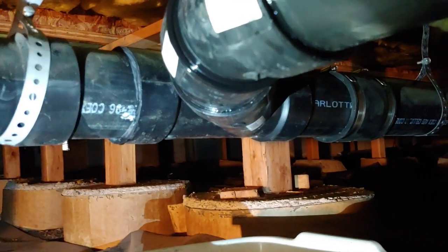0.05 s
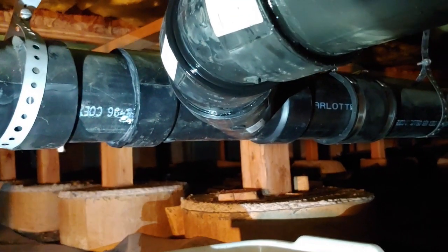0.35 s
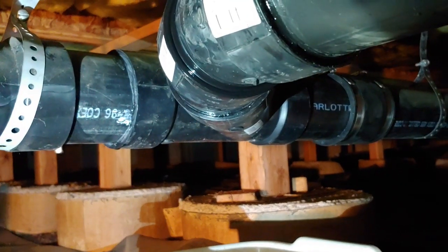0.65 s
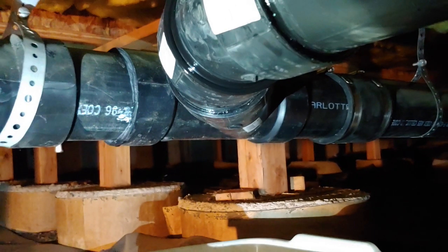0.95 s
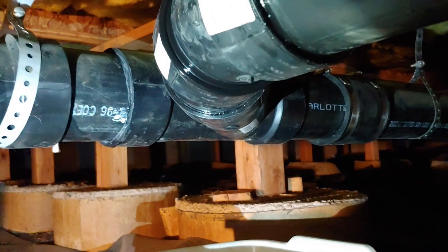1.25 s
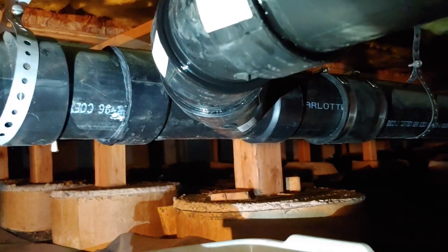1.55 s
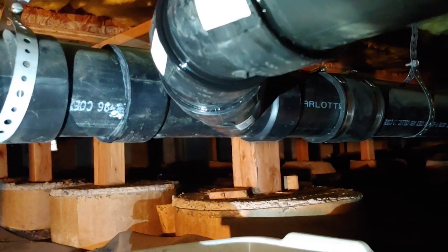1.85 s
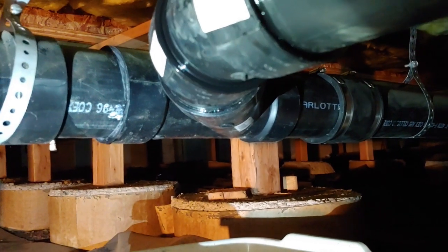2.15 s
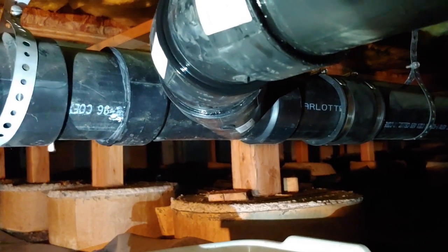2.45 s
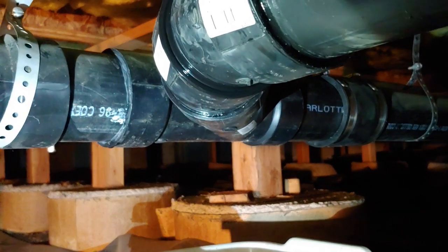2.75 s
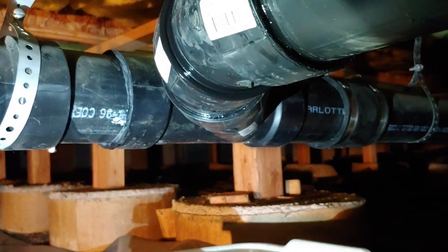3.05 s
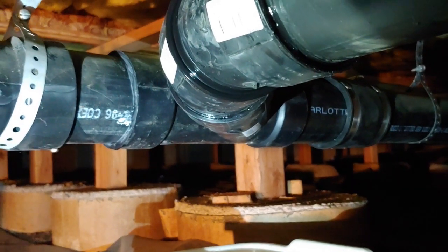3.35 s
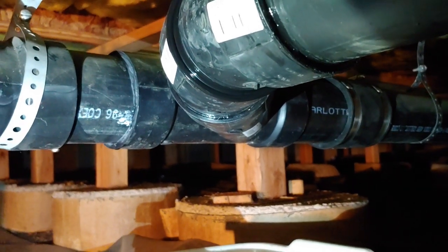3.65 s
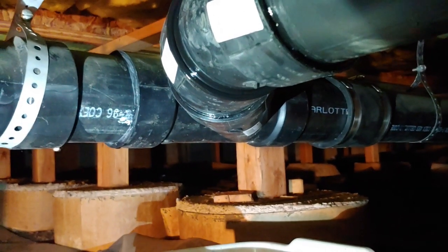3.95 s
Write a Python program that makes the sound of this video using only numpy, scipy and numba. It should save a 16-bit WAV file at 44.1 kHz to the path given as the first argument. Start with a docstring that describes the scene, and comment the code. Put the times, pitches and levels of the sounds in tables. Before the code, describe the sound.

Close up in a crawl space, waste water bubbles along a plastic pipe and gradually ebbs into light trickling and drips. Several dull, low thuds, like steps on the floor above, come through as it drains.

```python
"""Drain pipe in a crawl space

Waste water runs through a plastic pipe close by. Its rush of resonating bubbles and spray thins to a
trickle of single splats and plops, all filtered by the pipe wall. A few deep thumps, probably steps
on the floor above, shake the joists over a faint rumble."""
import sys
import numpy as np
from scipy import signal
from scipy.fft import rfft, irfft, next_fast_len
from scipy.io import wavfile
from numba import njit

SR = 44100
rng = np.random.default_rng(int(sys.argv[2]) if len(sys.argv) > 2 else 0)


def output_pcm(signal):
    """Save a mono or channel-first signal as 16-bit PCM at the path in sys.argv[1].

    Samples are clipped to [-1, 1] before scaling.
    """
    pcm = np.clip(np.atleast_2d(signal).T, -1, 1) * 32767
    wavfile.write(sys.argv[1], SR, np.round(pcm).astype(np.int16))


N = 176400
NEAR_RING_DB = 1.8  # single drops land close by, with less rattle of the wall


def undb(db):
    """Decibels to amplitude gain."""
    return 10 ** (np.asarray(db) / 20)


def unit(x):
    """Scale to rms 1."""
    return x / np.sqrt(np.mean(x ** 2))


def fade(t, t60):
    """Exponential decay from t = 0, 60 dB down at t60."""
    return np.exp(-np.log(1000) * np.maximum(t, 0) / t60)


def add(out, start, x):
    """Superpose x on out at a start in seconds."""
    i = max(int(start * SR), 0)
    out[..., i:i + x.shape[-1]] += x[..., :max(N - i, 0)]


def colour(x, points):
    """Minimum-phase filter through (Hz, dB) points, made by folding the cepstrum."""
    size = next_fast_len(x.shape[-1] + 4096, True) // 2 * 2
    hz, db = np.array(points).T
    log_hz = np.log(np.fft.rfftfreq(size, 1 / SR) + 1)
    cepstrum = irfft(np.log(undb(np.interp(log_hz, np.log(hz), db))))
    cepstrum[1:size // 2] *= 2
    cepstrum[size // 2 + 1:] = 0
    return irfft(rfft(x, size) * np.exp(rfft(cepstrum)))[..., :x.shape[-1]]


@njit
def bubbles(start, hz, cycles, size, glide=0.18):
    """Bubble resonance: each is a damped oscillator whose pitch rises as it dies."""
    out = np.zeros(N)
    for k in range(len(start)):
        length = int(1.5 * cycles[k] * SR / hz[k])
        onset, phase = int(start[k] * SR), 0.
        for i in range(min(length, N - onset)):
            phase += 2 * np.pi * hz[k] / SR * (1 + glide * i / length)
            out[onset + i] += size[k] * np.exp(-6. * i / length) * np.sin(phase)
    return out


def pipe(x, ring_db=3.5, ring_t60=0.026, room_db=-8.5, room_t60=0.16, lag_s=.00041):
    """Transmission through the wall to two ears: direct sound, wall rattle and room reverberation."""
    # Each row: frequency in Hz, gain of the pipe wall in dB.
    wall = [(150, -28), (400, -24.5), (510, -11.5), (640, -5.5), (900, -4.5), (1250, 2), (1750, -0.5),
            (2250, 1), (2700, -3.5), (3500, 0), (4400, -1), (5400, -4), (6200, -5.5), (7000, -3),
            (7700, -8), (8100, -16), (8650, -28.5), (9800, -13), (10500, -21), (11900, -12), (13000, -34),
            (15500, -30.5)]
    t = np.arange(SR // 4) / SR
    response = sum(undb(db) * unit(rng.standard_normal((2, len(t))) * fade(t, t60))
                   for db, t60 in [(ring_db, ring_t60), (room_db, room_t60)]) / np.sqrt(len(t))
    response[0, 0] += 1
    response[1, int(lag_s * SR * rng.uniform(.82, 1.18))] += 1  # direct sound reaches the right later
    return colour(signal.fftconvolve(x[None], response)[:, :len(x)], wall)


def rumble():
    """Faint background noise, partly coherent between the ears in the bass."""
    # Each row: time in seconds, level in dB.
    levels = [(0, -53), (2.45, -58.5), (2.7, -52.5), (3.5, -52), (4, -55.5)]
    # Each row: frequency in Hz, relative level in dB.
    spectrum = [(20, -6), (45, 6), (100, -4.5), (180, -1.5), (300, -12.5), (600, -23), (1500, -29),
                (5000, -39), (15000, -45.5)]
    mid, side = colour(rng.standard_normal((2, N)), spectrum)
    side = colour(side, [(60, -5), (140, -11), (300, -8), (700, -1)])
    gain = undb(np.interp(np.arange(N) / SR, *np.array(levels).T))
    return gain * unit(np.array([mid + side, mid - side]))


def thumps(sway_hz=39.44, attack_s=0.024, hold_s=0.047, pan_db=3.0):
    """Impact excitation: the floor sways at its lowest mode; the timbers knock and shudder."""
    # Each row: start in seconds, sway level in dB, shudder level in dB, shudder t60 in seconds.
    impacts = [(.755, -19.5, -35.5, 0.54), (1.383, -21, -40, 0.52), (1.989, -22, -44, 0.61),
               (2.641, -43.5, -39.5, 0.7), (3.05, -40.5, -36, 0.69)]
    # Each row: frequency in Hz, relative level of the shudder in dB.
    timbers = [(20, -22), (45, 1), (72, 10), (110, -12.5), (200, -12), (500, -36.5), (1000, -43),
               (3000, -84)]
    out, t = np.zeros(N), np.arange(SR) / SR
    rise = np.minimum(t / attack_s, 1)
    since_hold = t - attack_s - hold_s
    for start, sway_db, shudder_db, shudder_t60 in impacts:
        sway = np.sin(2 * np.pi * sway_hz * t) * fade(since_hold, t60=0.29)
        shudder = unit(colour(rng.standard_normal(len(t)), timbers)) * fade(t - attack_s, shudder_t60)
        wood = colour(rng.standard_normal(len(t)), [(100, -5), (330, 3.5), (560, -2), (2000, -33)])
        knock = undb(-34.5) * unit(wood) * fade(since_hold, t60=0.17)
        add(out, start, rise * (undb(sway_db) * (sway + knock) + undb(shudder_db) * shudder))
    return out * undb(np.array([[pan_db], [-pan_db]]) / 2)


def glugs(hz=171, width_s=0.022):
    """Air-column resonance: the pipe hums briefly when water closes it off."""
    # Each row: time of the peak in seconds, level in dB.
    closures = [(0.106, -42.5), (.175, -47), (0.214, -43), (0.599, -48.5), (1.14, -44.5), (1.749, -52.5)]
    t = np.arange(N) / SR
    return sum(undb(db) * np.exp(-((t - at) / width_s) ** 2) * np.sin(2 * np.pi * hz * (t - at))
               for at, db in closures)


def gurgle(count=130, lo_hz=460, hi_hz=820, cycles=20.):
    """Big air pockets resonate at low pitch while the pipe runs full."""
    # Each row: time in seconds, level in dB.
    levels = [(0, -45), (.85, -44), (1.6, -69)]
    times, db = np.array(levels).T
    when, pitch, size = rng.random((count, 3)).T
    hz = lo_hz + (hi_hz - lo_hz) * pitch
    pockets = pipe(bubbles(when * times[-1], hz, np.full(count, cycles), size))
    return unit(pockets) * np.sqrt(times[-1] * SR / N) * undb(np.interp(np.arange(N) / SR, times, db))


def plops(t60=0.038, glide=0.039, attack_s=0.00022, shed_count=4, shed_s=.011, shed_octaves=0.44):
    """Free oscillation of large bubbles, which bend upward in pitch and shed a few smaller ones."""
    # Each row: start in seconds, relative peak level in dB, pitch in Hz.
    large_bubbles = [(0.135, -25.5, 2110), (0.404, -18, 1330), (0.527, -16.5, 1644), (0.57, -21, 2450),
                     (0.74, -21, 1290), (0.953, -19.5, 1990), (1.102, -14.5, 1796), (1.272, -23, 1550),
                     (1.339, -21, 2310), (1.774, -30.5, 1178), (1.831, -30, 1235), (1.865, -22, 1630),
                     (1.941, -26, 2206), (2.058, -19, 1700), (2.142, -28.5, 2250), (2.202, -25, 2190),
                     (2.772, -28, 2305), (2.896, -30, 2900), (2.943, -31.5, 2280), (3.098, -33, 2820),
                     (3.135, -28.5, 1605), (3.162, -36, 2480), (3.176, -23, 2305), (3.216, -28.5, 2305),
                     (3.298, -24.5, 1750), (3.333, -20.5, 2056), (3.381, -32, 1297), (1.872, -30, 860),
                     (2.06, -23, 1113), (2.407, -32, 693), (2.425, -29.5, 746)]
    out, t = np.zeros((2, N)), np.arange(SR // 5) / SR
    shed_cycles = np.full(shed_count, 13.6)
    for start, db, hz in large_bubbles:
        phase = 2 * np.pi * np.cumsum(hz * (1 + glide * np.minimum(t / t60, 1))) / SR
        ring = np.sin(phase) * fade(t, t60) * (1 - np.exp(-t / attack_s))
        delay, pitch, size = rng.random((shed_count, 3)).T
        shed_hz = hz * 2 ** (shed_octaves * (2 * pitch - 1))
        shed = bubbles(delay * shed_s, shed_hz, shed_cycles, (.5 + size) * undb(-8))
        plop = pipe(ring + shed[:len(t)], NEAR_RING_DB)
        add(out, start, plop / np.abs(plop).max() * undb(db + 0.86))
    return out


def drop(hz, t60, crack_db, pan_db, crack_s=0.0011):
    """A drop's impact on the wall gives a broadband crack and a tiny resonating bubble; peak 1."""
    # Each row: frequency in Hz, gain of the crack in dB.
    spectrum = [(500, -57), (1800, -28), (3500, 5.5), (7000, 4), (12000, -1)]
    t = np.arange(SR // 5) / SR
    crack = colour(rng.standard_normal(len(t)) * np.exp(-t / crack_s), spectrum)
    ring = np.sin(2 * np.pi * hz * t) * fade(t, t60)
    out = pipe(ring + undb(crack_db) * crack, NEAR_RING_DB) * undb(np.array([[pan_db], [-pan_db]]) / 2)
    return out / np.abs(out).max()


def splats(ring_cycles=38, tick_hz=10700):
    """Impact transients: heavy drops slap the wall and fine droplets tick brightly."""
    # Each row: start in seconds, relative peak level in dB, pitch in Hz, crack against ring in dB.
    heavy_drops = [(0.0812, -17.5, 5080, -15), (0.6448, -21, 5280, 1), (0.951, -39, 3980, -19),
                   (1.0306, -18.5, 3480, -1), (1.2521, -25.5, 4660, -13), (1.4867, -24, 4160, -13),
                   (1.517, -26.5, 4120, -16), (1.6743, -19.5, 3890, -8), (1.705, -23.5, 3780, -20),
                   (1.7702, -28.5, 4100, -11), (1.783, -24, 4350, -20), (1.9063, -19, 5220, -17),
                   (1.9992, -25, 3660, 3), (2.0324, -19, 4300, 3), (2.068, -22, 3570, -6.5),
                   (2.2048, -23, 4000, 9), (2.2387, -16.5, 6120, -7), (2.2614, -25.5, 3800, 4),
                   (2.4035, -19, 5520, -10), (2.445, -26, 3880, -18), (2.5495, -24, 3630, -1),
                   (2.579, -16.5, 5060, -20), (2.6614, -28, 4700, -3), (2.807, -28, 4500, -19),
                   (2.831, -25, 5240, 1), (2.9477, -27, 7440, -23), (2.9835, -25, 2730, -13),
                   (3.009, -30, 5340, -3), (3.0596, -27.5, 4240, -2), (3.083, -25.5, 4250, -10),
                   (3.1363, -22, 6140, -11.5), (3.1576, -26, 6800, -24), (3.2998, -21, 4600, -1.5),
                   (3.3858, -35, 5930, -20), (3.417, -36, 4580, -21), (3.4367, -39, 3420, -16),
                   (3.559, -37, 4350, -22), (3.736, -34.5, 6490, -9), (3.83, -30.5, 4330, 7),
                   (3.8698, -33, 7160, -15.5), (3.8918, -35, 4570, -29)]
    # Each row: start in seconds, relative peak level in dB.
    droplets = [(0.083, -19.5), (0.1166, -22), (0.288, -22), (0.6963, -25), (0.725, -22.5), (0.8614, -32),
                (1.8622, -30.5), (2.0286, -23), (2.1015, -22), (2.409, -23), (3.417, -29.5), (3.8322, -37)]
    out = np.zeros((2, N))
    for start, db, hz, crack_db in heavy_drops:
        add(out, start, drop(hz, ring_cycles / hz, crack_db, pan_db=0.5) * undb(db + 5.5))
    for start, db in droplets:
        hz = tick_hz * rng.uniform(0.767, 1.233)
        add(out, start, drop(hz, t60=0.0041, crack_db=-15.5, pan_db=0) * undb(db - 4))
    return out


def flow(candidates=4000, spots=4, full_db=-34.5, thinning=.8, surge_s=0.021, wash_db=-24.5):
    """Incoherent sum of bubble resonances over a smooth wash; they grow sparser as the water ebbs."""
    # Each row: time in seconds, then relative levels in dB of large bubbles, small bubbles and spray.
    levels = np.array([(0, -40.5, -37.5, -35), (0.119, -38, -35.5, -34), (.65, -41.5, -39, -35.5),
                       (1.08, -43, -38, -35.5), (1.319, -43.5, -43, -37.5), (1.58, -56.5, -47, -42.5),
                       (1.8, -54, -47.5, -44.5), (2.08, -57, -46, -42), (2.321, -55, -48.5, -43),
                       (2.551, -51.5, -44, -40.5), (2.85, -55, -48, -44), (3.12, -60, -50.5, -45),
                       (3.36, -56, -53.5, -48.5), (3.55, -71, -65, -57), (3.78, -74, -66.5, -55),
                       (3.91, -69, -55, -56), (4, -74.5, -73, -81)])
    # Slugs of water and lulls. Each row: time in seconds, change of level in dB.
    surges = [(0.602, -1.5), (0.667, 3), (.82, -2.5), (1.217, -5), (1.285, 1), (1.416, -5), (1.497, 6.5),
              (1.813, -1.5), (1.866, 6.5), (2.151, 2.5), (2.212, 3), (2.408, 4.5), (2.459, 3), (2.775, 0.5),
              (2.878, -8.5), (2.95, -0.5), (3.234, -6.5), (3.399, -9), (3.478, 5), (3.575, -6),
              (3.794, -15.5), (3.97, -5)]
    # Large bubbles, small bubbles, spray, mist. Each row: lowest and highest pitch in Hz, nominal
    # ringing in cycles, count per second at full flow, spread of sizes in dB, trim in dB.
    bands = [(428, 1454, 15.2, 1100, 3.5, 1), (1443, 3116, 25.4, 950, 3.5, 3.5),
             (3174, 8070, 33, 1200, 4, 2.5), (8000, 14100, 16.7, 900, 3.5, -12.5)]
    t, out = np.arange(N) / SR, 0
    surge_db = sum(db * np.exp(-((t - at) / surge_s) ** 2) for at, db in surges)
    for k, (lo_hz, hi_hz, cycles, full_rate, spread_db, trim_db) in enumerate(bands):
        db = np.interp(t, levels[:, 0], levels[:, 1 + min(k, 2)]) + surge_db  # mist follows the spray
        rate = full_rate * undb(thinning * (db - full_db))
        cloud = 0
        for _ in range(spots):
            when, chance, pitch, ring, size_rank = rng.random((candidates, 5)).T
            local_rate = rate[(when * N).astype(int)]
            born = chance < local_rate * N / SR / candidates / spots
            hz = lo_hz + (hi_hz - lo_hz) * pitch
            rings = cycles * 2 ** (3 * ring - 2)
            # The square root keeps mean power independent of ring time and rate.
            size = undb(-spread_db * np.log(size_rank + .015)) * np.sqrt(hz / rings / local_rate)
            cloud = cloud + pipe(bubbles(when[born] * N / SR, hz[born], rings[born], size[born]))
        bandpass = signal.butter(2, [lo_hz, hi_hz], "band", fs=SR, output="sos")
        wash = pipe(signal.sosfilt(bandpass, rng.standard_normal(N)))
        gain = undb(db + trim_db)
        out = out + unit(cloud * gain) * np.sqrt(np.mean(gain ** 2)) + undb(wash_db) * unit(wash) * gain
    return out


def scene():
    """A level difference between the ears sets the pipe to the left, amid the low sounds."""
    # Each row: frequency in Hz, level of left over right in dB.
    left_lead = [(300, 12), (520, 4), (700, 5), (1150, 11), (1500, 0), (1900, -6), (2300, 5.5), (2700, 10),
                 (3450, 3.5), (4500, 7.5), (5500, 13.5), (6200, 10), (7000, -8), (7800, -1.5), (9800, 16.5),
                 (12000, 12.5)]
    water = flow() + gurgle() + plops() + splats()
    water = np.array([colour(channel, [(hz, sign * db / 2) for hz, db in left_lead])
                      for channel, sign in zip(water, (1, -1))])
    return water + glugs() + thumps() + rumble()


def record(dry):
    """Band limiting: a steep low-pass cuts the treble above 15.8 kHz."""
    return signal.sosfilt(signal.ellip(10, .2, 80, 15800, fs=SR, output="sos"), dry)


dry = scene()
out = record(dry)
output_pcm(out)
```